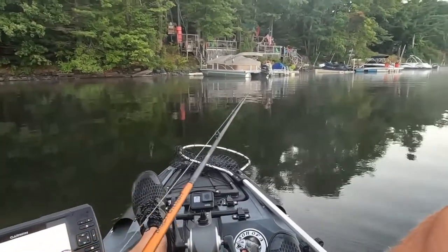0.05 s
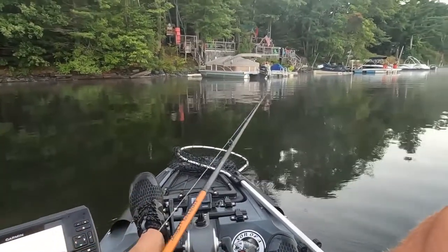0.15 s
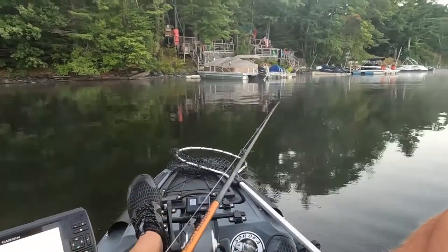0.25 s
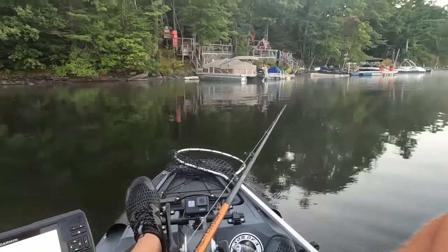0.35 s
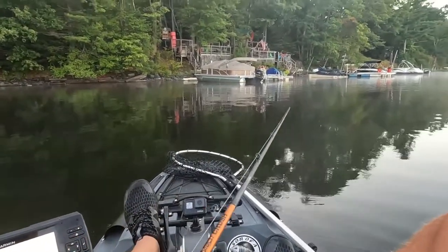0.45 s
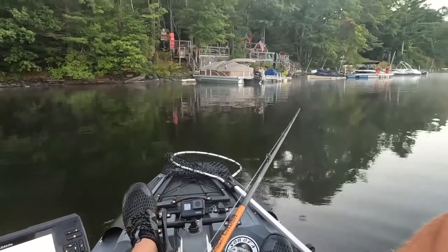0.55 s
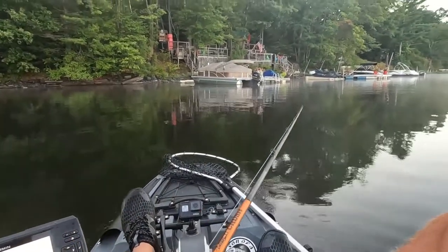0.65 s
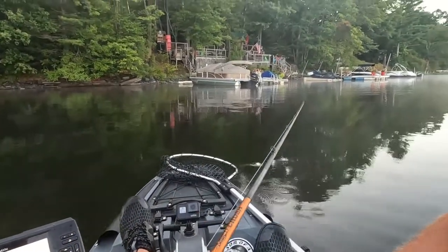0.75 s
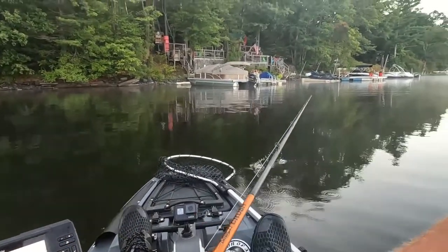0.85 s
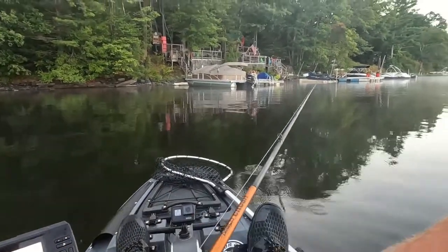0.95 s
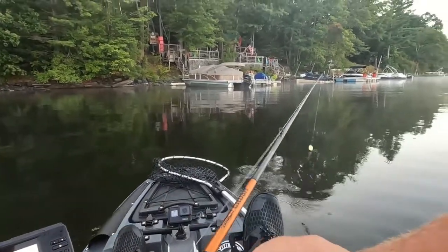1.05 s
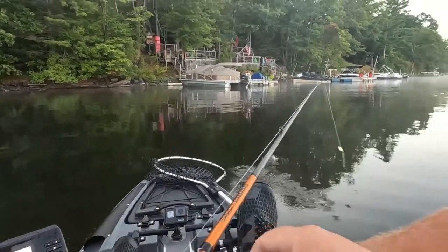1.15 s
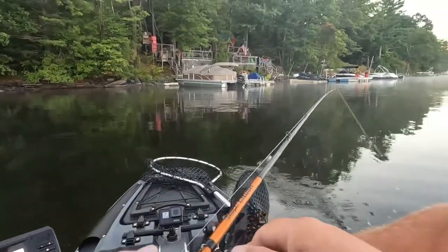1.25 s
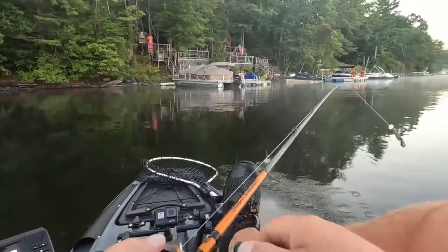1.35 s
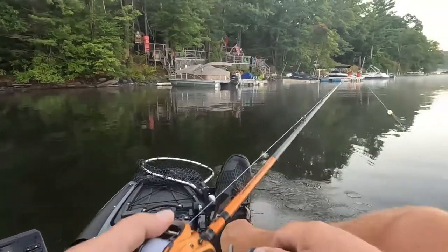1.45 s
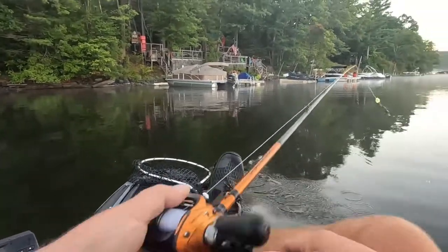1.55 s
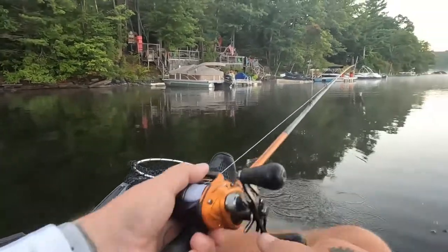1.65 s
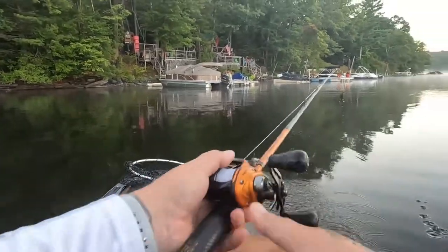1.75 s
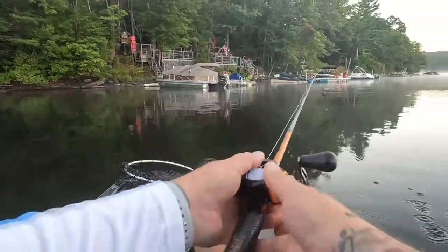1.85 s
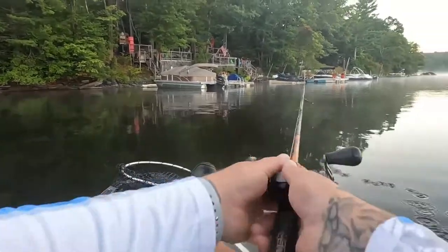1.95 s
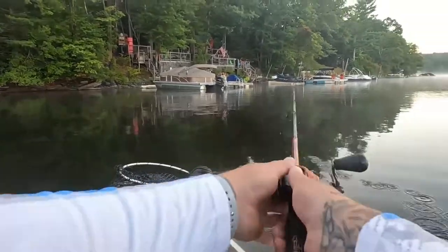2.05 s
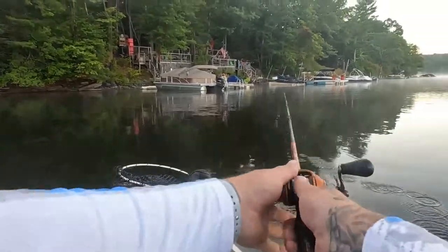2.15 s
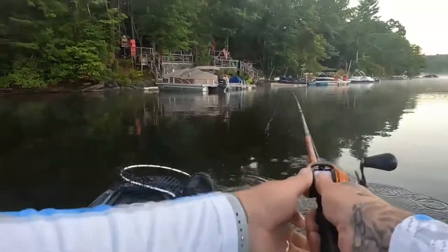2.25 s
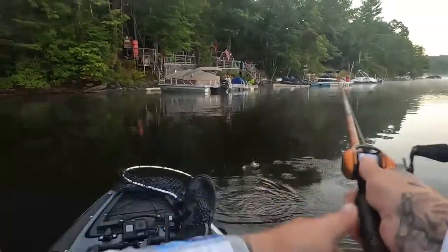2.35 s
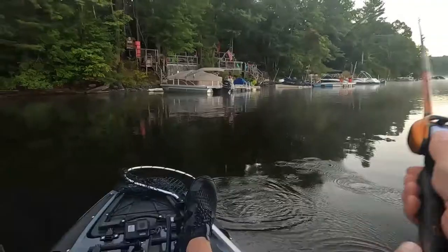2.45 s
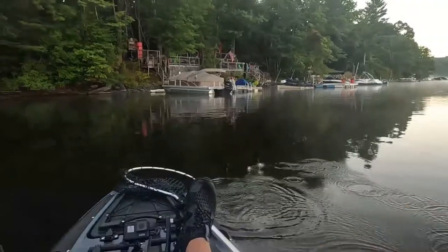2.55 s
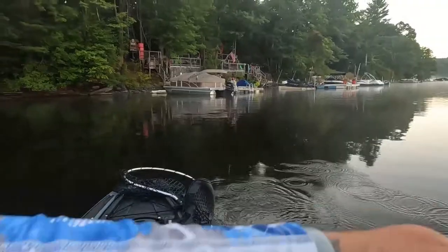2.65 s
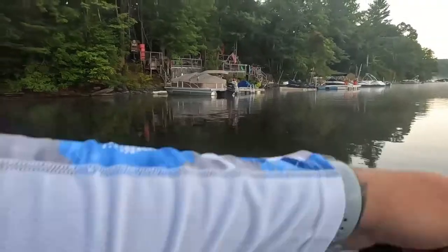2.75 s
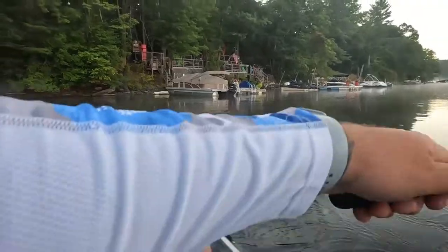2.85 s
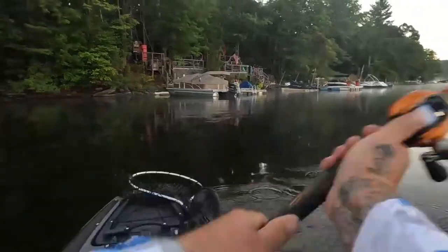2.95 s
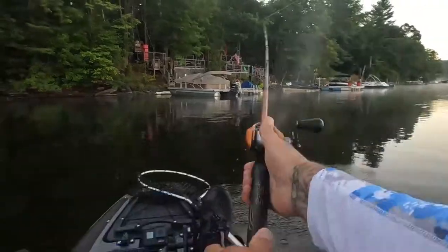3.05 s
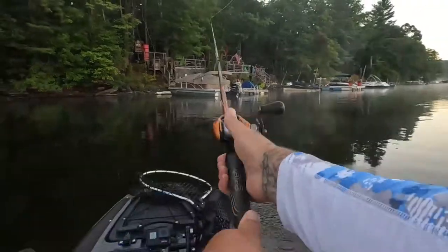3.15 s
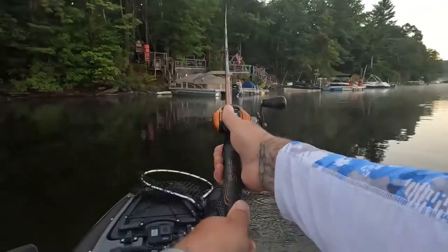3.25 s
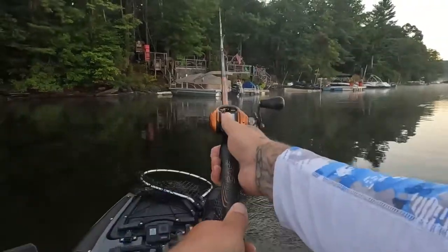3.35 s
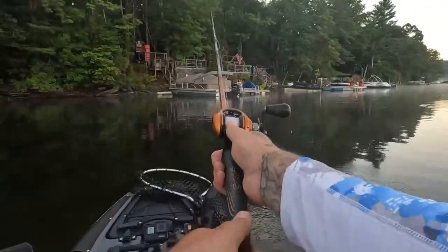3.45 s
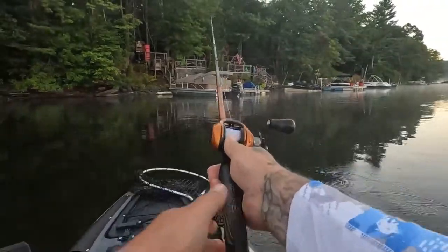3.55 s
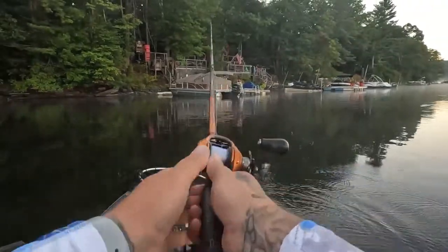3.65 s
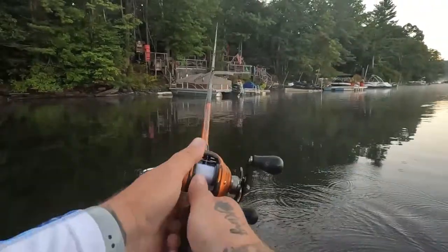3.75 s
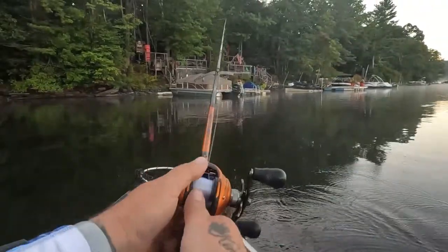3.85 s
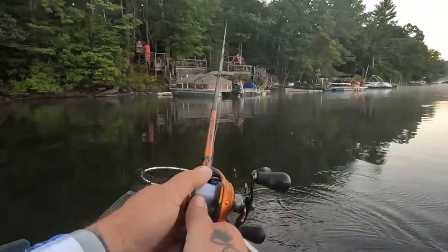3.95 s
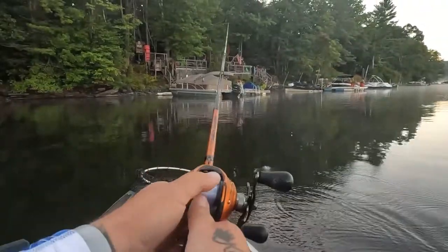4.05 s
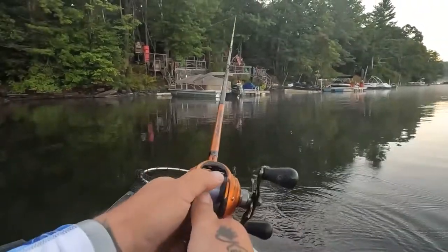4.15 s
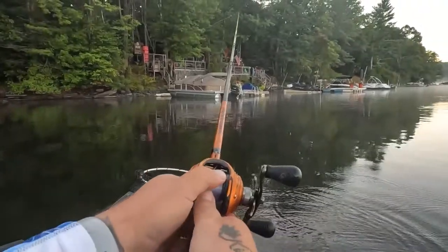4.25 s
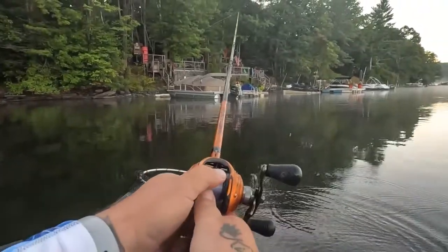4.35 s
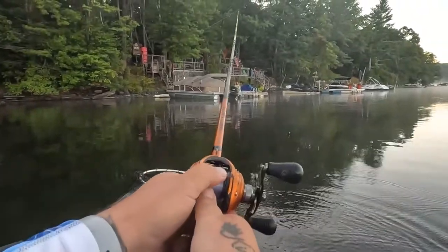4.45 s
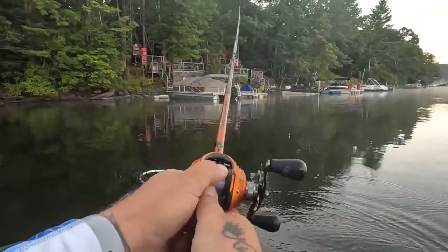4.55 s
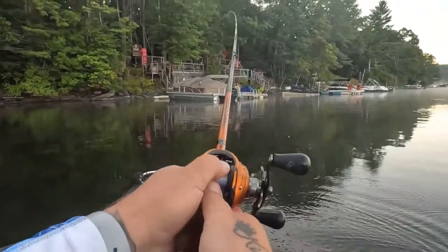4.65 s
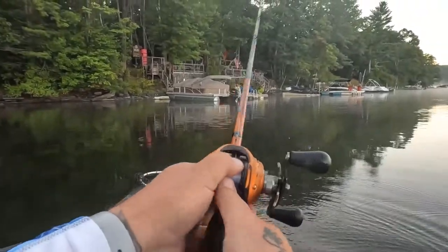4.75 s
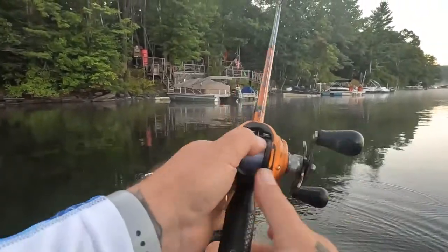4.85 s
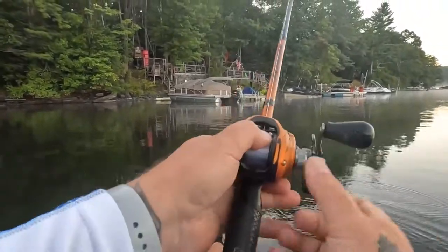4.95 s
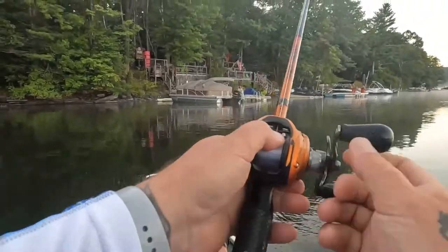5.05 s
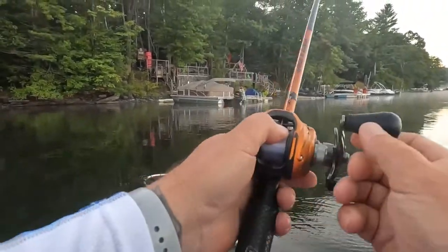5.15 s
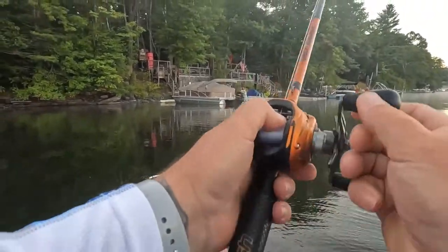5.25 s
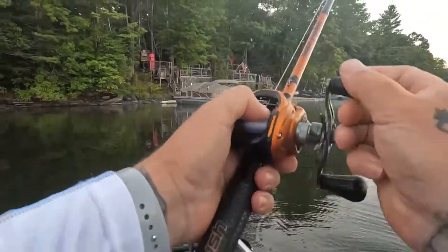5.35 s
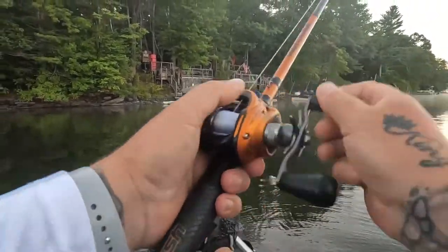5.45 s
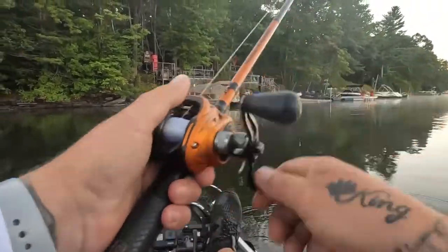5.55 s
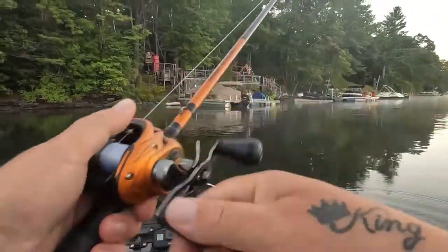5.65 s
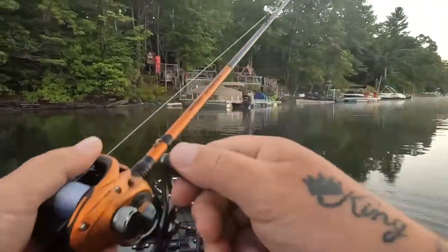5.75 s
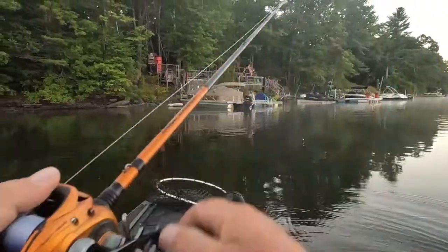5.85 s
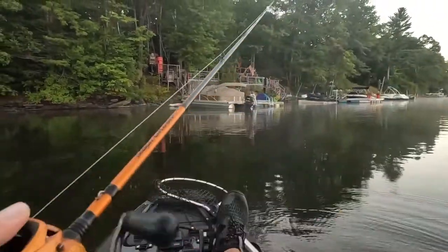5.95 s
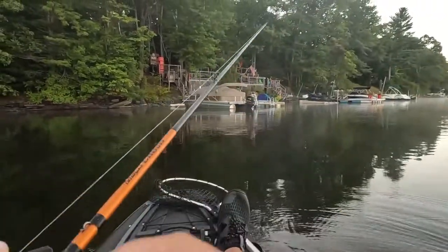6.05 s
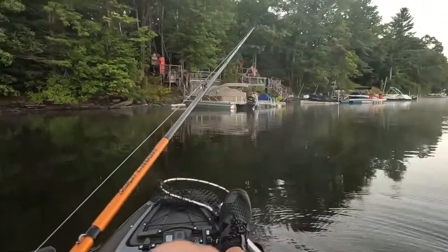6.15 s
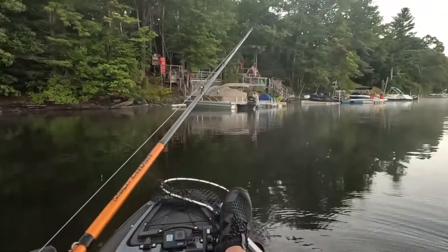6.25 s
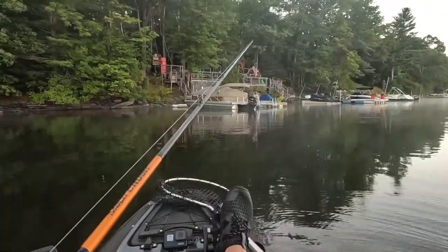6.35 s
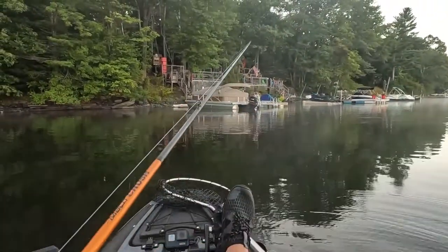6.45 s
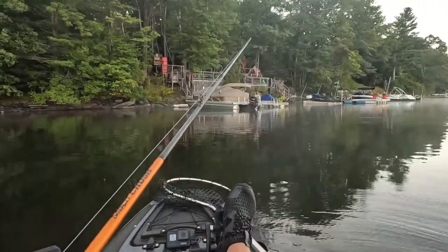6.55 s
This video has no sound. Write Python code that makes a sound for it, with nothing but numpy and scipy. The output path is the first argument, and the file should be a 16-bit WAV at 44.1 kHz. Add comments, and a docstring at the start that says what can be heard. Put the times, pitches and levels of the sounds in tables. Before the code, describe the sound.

Outdoors on a calm lake, a steady low air rumble and a faint wavering insect chorus lie beneath close handling sounds. From 0 to 1.2 s a reel winds with a soft, grainy gear whir, pulsing with each turn, with bright wet-line ticks, tiny rising drips and, near 0.9 s, dull hollow bumps and a little slosh. A short winding follows at 1.5-1.8 s, then rustling. At 2.33 s the clutch clicks free, crisp and doubled. More rustle at 2.8 s; at 3.03 s a sharp tick, bump and squeak, then a short cast whoosh to 3.2 s with a low gust. Line whirs off, hum and brightness falling, with prickly slaps, faint whistles and a thin descending whine, until 4.73 s. Light rustles and ticks follow. At 5.39 s a very loud metallic snap engages the reel; winding, rustle and small water laps resume from 5.56 s to the end.

```python
"""A calm lake: from a kayak an angler winds in a lure, frees the spool, casts and engages the reel again.
Gear teeth ring the housing, wet line ticks through the guides, clumped grains rustle, the clutch snaps in bursts.
Drops chirp, bumps ring dully and bubbles slosh; the cast is a noise whoosh and a gust at the microphone.
The spool hums and whines as it slows, and running line whirs, slaps and whistles.
Filtered noise makes the insects on the wooded shore and the low rumble of air at the microphone."""
import sys
import numpy as np
from scipy import signal
from scipy.fft import rfft, irfft, next_fast_len
from scipy.io import wavfile
from scipy.ndimage import uniform_filter1d

SR = 44100
rng = np.random.default_rng(int(sys.argv[2]) if len(sys.argv) > 2 else 0)


def unload_audio(sound):
    """Save the sound as a 16-bit wav file, at the path given as the first command line argument."""
    columns = np.transpose(np.atleast_2d(sound))
    # keep every value between -1 and 1, then stretch to whole-number steps
    steps = np.round(np.clip(columns, -1, 1) * 32767)
    wavfile.write(sys.argv[1], SR, steps.astype(np.int16))


N = 290608

# bouts of turning the handle: (start [s], end [s], mean whir level [dB],
# lift of the lowest ring against the others [dB], moment of a push [s])
WINDING = [(0, 1.174, -58.5, -5, .23), (1.455, 1.762, -58.5, 5, 1.6), (5.564, 6.18, -56, 9, 5.685),
           (6.213, 6.591, -56.5, -1, 6.24)]
# rings of the gear housing: (frequency [Hz], width [Hz], relative level [dB])
GEARS = [(1040, 79, 0), (2060, 720, 11.5), (3500, 1360, 5.5), (5500, 640, -2), (7500, 260, -2.5),
         (11800, 2100, -8)]
# rustling noise swells; the one at 5.38 s is a brief hiss just before the snap:
# (start [s], end [s], level [dB])
RUSTLE = [(0, 0.318, -63.5), (0.859, 1.188, -70), (1.298, 1.623, -77), (1.67, 1.843, -63),
          (1.916, 2.118, -57), (2.241, 2.494, -71), (2.792, 3.024, -60), (4.816, 4.875, -61),
          (4.942, 5.1, -64), (5.384, 5.38, -54.5), (5.598, 6.242, -61), (6.356, 6.59, -63.5)]
# free spool slowing down: (time [s], speed [turns/s])
SPOOL = [(3.2, 291), (3.49, 256), (3.6, 232), (3.82, 191), (4.09, 127), (4.15, 119), (4.35, 96),
         (4.729, 72)]
# treble of the line whir: (time [s], relative level [dB])
TREBLE = [(3.2, 2.5), (3.68, 0.5), (3.71, -6), (3.8, -3), (3.85, 4), (3.97, 1), (4.07, -0.5), (4.11, 2),
          (4.17, -1.5), (4.48, 5.5), (4.55, -4), (4.7, 2), (4.715, -12)]


def amp(db):
    """Decibels to gain."""
    return 10 ** (np.asarray(db, float) / 20)


def rms_one(x):
    """Scale to unit rms."""
    return x / np.sqrt(np.mean(x ** 2) + 1e-20)


def in_time(rows):
    """Columns of a curve table, one value a sample."""
    s, *columns = np.transpose(rows)
    return [np.interp(np.arange(N) / SR, s, c) for c in columns]


def envelope(table):
    """Gain from a (time [s], level [dB]) curve."""
    return amp(in_time(table)[0])


def swells(rows, rise_db_per_s, fall_db_per_s):
    """Summed gain of (start [s], end [s], level [dB]) rows: rise up to the start, hold, fall from the end."""
    t = np.arange(0, N + 16, 16) / SR
    gain = 0
    for start, end, db in rows:
        rise = rise_db_per_s * np.maximum(start - t, 0)
        fall = fall_db_per_s * np.maximum(t - end, 0)
        gain = gain + amp(db - rise - fall)
    return np.interp(np.arange(N) / SR, t, gain)


def at_hz(points, hz):
    """Spectrum table read on a log-frequency axis."""
    point_hz, value = np.array(points).T[:2]
    return np.interp(np.log(hz + 1e-9), np.log(point_hz), value)


def drift(rate_hz):
    """Slow random wander of unit rms: twice-smoothed noise, drawn every 40 samples."""
    r = np.exp(-80 * np.pi * rate_hz / SR)
    noise = rng.standard_normal(N // 40 + 2002)
    slow = signal.lfilter([1], [1, -2 * r, r * r], noise)[2000:]
    return np.interp(np.arange(N) / 40, np.arange(len(slow)), rms_one(slow))


def grains(per_s, spread_db):
    """Two trains of random contacts of uneven size and random sign."""
    sizes = amp(spread_db * np.minimum(rng.exponential(1, (2, N)), 5))
    signs = rng.choice([-1, 1], (2, N))
    return sizes * signs * (rng.random((2, N)) < per_s / SR)


def mix_sides(mid, side, alike):
    """Mid and side sources to left and right with a given likeness between the channels."""
    alike = np.clip(alike, -1, 1)
    return np.sqrt(1 + alike) * mid + np.sqrt(1 - alike) * side * np.array([[1], [-1]])


def coloured(pair, spectrum):
    """A mid and a side source shaped by a spectrum and mixed to left and right; rms 1."""
    # how alike left and right are: (frequency [Hz], likeness [-1 to 1])
    likeness = [(30, 0.92), (60, 1), (150, 0.96), (400, 0.62), (1400, 0.41), (5000, 0.67), (15000, 0.054)]
    size = next_fast_len(N)
    hz = np.arange(size // 2 + 1) * SR / size
    mid, side = rfft(pair, size)
    both = mix_sides(mid, side, at_hz(likeness, hz))
    return rms_one(irfft(both * amp(at_hz(spectrum, hz)), size)[:, :N])


def spread(pair, alike, pan_db):
    """Mid and side to left and right at unit rms, then panned; positive leans left."""
    return rms_one(mix_sides(*pair, alike)) * amp([[pan_db / 2], [-pan_db / 2]])


def resonance(x, hz, width_hz):
    """Two-pole peak of gain 1."""
    r = np.exp(-np.pi * width_hz / SR)
    feedback = [1, -2 * r * np.cos(2 * np.pi * hz / SR), r * r]
    return signal.lfilter(np.array([1, 0, -1]) * (1 - r * r) / 2, feedback, x)


def add(out, s, sound, peak_db, pan_db):
    """Place a short sound at its moment with a peak level before panning; it reaches the left port late."""
    lag_samples = .5
    i = round(s * SR)
    sound = sound[:N - i] / np.abs(sound).max() * amp(peak_db)
    steps = np.arange(len(sound))
    late = np.interp(steps - lag_samples, steps, sound, left=0)
    out[0, i:i + len(sound)] += late * amp(pan_db / 2)
    out[1, i:i + len(sound)] += sound * amp(-pan_db / 2)


def rumble():
    """Low noise of moving air at the microphone, a little stronger on the left."""
    # (time [s], level before panning [dB])
    air_level = [(0.0, -42), (1.8, -40.5), (6.59, -42.5)]
    # (frequency [Hz], relative level per Hz [dB])
    air_colour = [(15, -9), (28, -8), (66, -0.5), (120, -6), (206, -17), (300, -23), (500, -33), (800, -34),
                  (1500, -58)]
    noise = coloured(rng.standard_normal((2, N)), air_colour)
    return noise * envelope(air_level) * amp([[.8], [-.8]])


def shore():
    """Noise shaped to a dull far hum and an insect chorus, wavering in level."""
    # (frequency [Hz], relative level per Hz [dB])
    chorus_colour = [(600, -69), (900, -16.5), (1100, -4), (1400, -8.5), (1800, -21.5), (3300, -27),
                     (4150, -11.5), (4400, -3.5), (4900, -3.5), (5300, -10), (5700, -26.5), (9000, -40.5),
                     (16000, -66)]
    # level about which the chorus wavers: (time [s], level [dB])
    chorus_level = [(0, -55), (3, -58.5), (6.59, -56)]
    noise = coloured(rng.standard_normal((2, N)), chorus_colour)
    return noise * envelope(chorus_level) * amp(1.3 * drift(27.4))


def winding():
    """Dense tooth contacts ring the gear housing, left of the microphone."""
    handle_turn_s, push_db = .34, 3.2
    teeth = grains(2000, spread_db=3.2) * amp(3 * drift(12))
    rings = []
    for hz, width_hz, db in GEARS:
        ring = resonance(resonance(teeth, hz, 2 * width_hz), hz, width_hz)
        rings.append(amp(db) * ring / np.sqrt(width_hz))
    lowest, others = rings[0], sum(rings[1:])
    out = 0
    for start, end, db, low_db, push in WINDING:
        # the whir jumps at each push, then sags
        since_push = (np.arange(N) / SR - push) / handle_turn_s % 1
        bout = swells([(start, end, db)], rise_db_per_s=250, fall_db_per_s=175)
        effort = bout * amp(push_db * (1 - 2 * since_push))
        out = out + spread(lowest * amp(low_db) + others, alike=0.59, pan_db=3.5) * effort
    return out


def rustle():
    """Rustling noise: dense small grains, clumped by a wandering level and shaped by a spectrum."""
    # (frequency [Hz], relative level per Hz [dB])
    rustle_colour = [(300, -29), (1300, -2.5), (2500, -4), (6000, -7.5), (10500, -13.5), (11800, -8),
                     (14400, -20), (16000, -23)]
    clumps = grains(7000, spread_db=0.5) * amp(1.22 * drift(44))
    return coloured(clumps, rustle_colour) * swells(RUSTLE, rise_db_per_s=229, fall_db_per_s=175)


def ticks():
    """Wet line and fingers tick: tiny bursts in a wide resonance that also tap the gear housing."""
    # ticks on guides and reel: (time [s], peak level before panning [dB], pitch [Hz])
    clear_ticks = [(0.025, -33.5, 7950), (0.0598, -36.5, 7400), (0.0967, -36, 7560), (0.1454, -32, 6800),
                   (0.212, -28.5, 7250), (0.2386, -23, 7260), (0.2871, -29, 6800), (0.365, -30.5, 6500),
                   (0.4313, -27, 7500), (0.4625, -35.5, 7850), (0.514, -30.5, 7360), (0.528, -37, 7700),
                   (0.887, -25.5, 6100), (1.036, -32, 10400), (1.2154, -34.5, 7140), (1.561, -36.5, 5600),
                   (1.706, -34, 5450), (1.8801, -23.5, 5630), (2.3123, -36, 4960), (3.0447, -18, 5700),
                   (4.8508, -36, 6700), (4.861, -33.5, 6530), (5.288, -47, 5500), (5.961, -39, 6990),
                   (6.347, -37, 7050), (6.3876, -36, 7300), (6.4358, -37, 7200), (6.4717, -40, 7700),
                   (6.538, -37, 7500)]
    faint_per_s, loudest_faint_db = 5.6, -42.5
    out, t = np.zeros((2, N)), np.arange(1500) / SR
    # faint ticks fall at random during the winding and the rustling
    faint = []
    for start, end, *_ in WINDING + RUSTLE:
        for at, weak, high, odds in rng.random((20, 4)):
            if odds < faint_per_s * (end - start) / 20:
                s = start + at * (end - start - .01)
                faint.append((s, loudest_faint_db - 8 * weak, 5500 + 3000 * high))
    for s, db, hz in clear_ticks + faint:
        burst = rng.standard_normal(len(t)) * t * np.exp(-t / 0.00043)
        burst = signal.lfilter([1, -.7], [1], burst)
        housing = resonance(burst, *GEARS[1][:2])
        add(out, s, resonance(burst, hz, 940) + 0.26 * burst + 0.42 * housing, db, pan_db=11.0)
    return out


def drips():
    """Drops off the lure and a squeak at the release: short blips that rise in pitch and flutter."""
    # (time [s], peak level [dB], starting pitch [Hz])
    blips = [(0.3823, -44, 1280), (0.406, -48, 2140), (0.638, -50, 1270), (0.786, -41.5, 1090),
             (0.955, -39.5, 1200), (0.966, -43, 1045), (1.009, -45, 1320), (1.1414, -47, 2390),
             (1.196, -46, 2260), (3.034, -38, 2450), (3.044, -33, 2380), (3.057, -32, 2430)]
    out, t = np.zeros((2, N)), np.arange(1500) / SR
    for s, db, hz in blips:
        flutter = 1 + 2.7 * uniform_filter1d(rng.standard_normal(len(t)), size=40)
        tone = np.sin(2 * np.pi * hz * t * (1 + 1.7 * t))
        add(out, s, flutter * tone * t * np.exp(-t / 0.0025), db, 0)
    return out


def clutch():
    """Each knock or snap is a short rattle into the reel's modes, strongest near its own region."""
    # parts of the reel knocking: (time [s], peak level before panning [dB], strongest region [Hz])
    knocks = [(0.43, -35.5, 1380), (0.904, -38.5, 2510), (0.938, -39.5, 2230), (1.036, -41, 1800),
              (1.88, -43, 2000), (2.491, -47.5, 3480), (3.134, -22.5, 4000), (5.409, -39, 2800),
              (5.4126, -37, 2820), (5.418, -42, 2200), (5.844, -44, 1300), (6.029, -45, 1800),
              (6.357, -48, 2250)]
    # clutch out, then in, each a catch, blow and settling:
    # (time [s], peak level before panning [dB], rattle decay [ms], strongest region [Hz])
    snaps = [(2.3326, -15.5, 0.36, 4550), (2.3339, -13.5, 0.98, 4220), (2.338, -34, 2.5, 5000),
             (5.3903, -13, 0.45, 2380), (5.3921, -3, 0.78, 5740), (5.394, -27, 2.8, 2360)]
    # modes of the reel: (frequency [Hz], relative level [dB])
    modes = [(1250, 21.5), (1700, 11), (2200, 14.5), (2800, 0), (3500, 12.5), (3950, -0.5), (4580, 9),
             (5550, -3), (6650, 4), (7900, 6.5), (8900, -18), (10400, -15), (11800, -10), (14000, -8)]
    # shove as the clutch snaps in: (time [s], peak level [dB], decay [ms])
    jolt = (5.394, -17, 1.8)
    knock_ms = 3.15
    out, t = np.zeros((2, N)), np.arange(1500) / SR
    rattles = [(s, db, knock_ms, hz) for s, db, hz in knocks] + snaps
    for s, db, rattle_ms, centre_hz in rattles:
        burst = rng.standard_normal(len(t)) * t * np.exp(-t * 1000 / rattle_ms)
        rings = 0
        for hz, mode_db in modes:
            weight = amp(mode_db - 10.4 * np.log2(hz / centre_hz) ** 2)
            rings = rings + weight * resonance(burst, hz, 250 + 0.075 * hz)
        add(out, s, rings, db, .3)
    s, db, decay_ms = jolt
    add(out, s, -t * np.exp(-t * 1000 / decay_ms), db, 0)  # a one-sided pulse
    return out


def slosh():
    """Water stirred by lure and hull: small bubbles and laps ring a few cycles over three octaves."""
    # (start [s], end [s], level [dB])
    stirs = [(.89, 1.12, -55.5), (5.69, 5.74, -55.5), (6.03, 6.08, -54)]
    born, dealt = grains(1000, spread_db=0.5), rng.integers(0, 16, N)
    laps = 0
    for k, hz in enumerate(np.geomspace(300, 2500, 16)):
        bubbles = born * (dealt == k) + 1e-18
        laps = laps + resonance(bubbles, hz, hz / 4.4) * amp(-3.0 * np.log2(hz / 500))
    return spread(laps, alike=0.46, pan_db=0.0) * swells(stirs, rise_db_per_s=145.0, fall_db_per_s=161)


def bumps():
    """Lure, rod butt and hull bump: a ragged scuff rings a dull hollow."""
    # (time [s], peak level [dB], pitch [Hz], scuff decay [ms])
    thuds = [(.894, -31, 284, 3.5), (.904, -33.5, 257, 3.4), (.916, -38.5, 239, 6.3), (2.823, -39, 520, 2),
             (3.0285, -25.5, 545, 2.8), (3.037, -26, 382, 2.6), (6.055, -44, 507, 4.0)]
    out, t = np.zeros((2, N)), np.arange(1500) / SR
    for s, db, hz, scuff_ms in thuds:
        noise = rng.standard_normal(len(t)) * t * np.exp(-t * 1000 / scuff_ms)
        scuff = resonance(noise, hz, 1.4 * hz)
        add(out, s, resonance(scuff, hz, 0.63 * hz) + 0.21 * scuff, db, 0)
    return out


def line_rub():
    """Wet line squeezes through the tip guide: dense contacts hiss through two resonances in turn."""
    # (start [s], end [s], level before panning [dB])
    rubs = [(1.77, 1.8, -59)]
    hiss = resonance(resonance(grains(4600, spread_db=-13.5), 4500, 900), 6000, 900)
    return spread(hiss, alike=0.75, pan_db=6.0) * swells(rubs, rise_db_per_s=42, fall_db_per_s=700)


def whoosh():
    """Rod, then line, cut the air: turbulence as dense uneven grains of noise."""
    # (start [s], end [s], level [dB])
    cuts = [(3.03, 3.05, -41.5), (3.135, 3.16, -31.5)]
    # (frequency [Hz], relative level per Hz [dB])
    swish_colour = [(150, 5), (250, 2.5), (748, -1), (1220, 0), (1640, -0.5), (3520, -2), (7980, -13),
                    (10500, -10), (14700, -16), (16000, -44)]
    air = coloured(grains(6000, spread_db=3.5), swish_colour)
    return air * swells(cuts, rise_db_per_s=507, fall_db_per_s=246)


def gust():
    """The swing pushes air over the microphone ports: slow lumpy noise, stronger in the right port."""
    # (start [s], end [s], level before panning [dB])
    pushes = [(3.055, 3.12, -32.5)]
    band = signal.butter(2, [16, 52], "band", fs=SR, output="sos")
    low = signal.sosfilt(band, rng.standard_normal((2, N)))
    return spread(low, alike=0.9, pan_db=-11.0) * swells(pushes, rise_db_per_s=220, fall_db_per_s=95)


def spool():
    """The slowing spool drives an unbalance hum, the whir of the line and a whine against the thumb."""
    turns, = in_time(SPOOL)
    octaves = np.log2(turns / 280)  # hum and whir levels refer to 280 turns/s
    angle = 2 * np.pi * np.cumsum(turns * (1 + 0.00261 * drift(20.1))) / SR
    running = swells([(SPOOL[0][0], SPOOL[-1][0], 0)], rise_db_per_s=500, fall_db_per_s=2000)
    return running * (spool_hum(octaves, angle) + line_whir(octaves, angle) + thumb_whine(turns, angle))


def spool_hum(octaves, angle):
    """Unbalance shakes the reel at multiples of the turning rate, weakening as the spool slows."""
    # (multiple of the turning rate, relative level [dB], dies away from [s])
    orders = [(1, 5, 3.7), (2, -3, 3.49), (4, -2, 3.54)]
    db_at_reference, db_per_octave = -55, 16
    hum = 0
    for k, db, end in orders:
        fade = swells([(0, end, db)], rise_db_per_s=1, fall_db_per_s=300)
        hum = hum + amp(3.5 * drift(30)) * fade * np.sin(k * angle)
    return amp(db_at_reference + db_per_octave * octaves) * hum


def line_whir(octaves, angle):
    """Running line flaps in the guides, a little unevenly each turn, and rings guides and reel frame."""
    # (frequency [Hz], width [Hz], relative level free [dB], relative level under the thumb [dB])
    frame_modes = [(1010, 640, -5.5, -6), (1467, 230, -10.5, 2), (2000, 416, -4.5, 3), (2450, 520, -5, -7),
                   (3250, 600, -1, 0), (5200, 1600, -10.5, -5.5), (7700, 610, -14.5, -16),
                   (9700, 1500, -14.5, -17), (11100, 2100, -16, -8.5), (13700, 2100, -18, -30)]
    # the whir surges briefly: (start [s], end [s], added level before panning [dB])
    surges = [(4.1, 4.13, -52)]
    db_at_reference, db_per_octave = -41.5, 6
    treble_hz = 6000
    thumb_from_s, thumb_down_s = 3.56, 4.4
    # the thumb settles on the spool: share of its colour, never under a tenth
    thumb = np.clip((np.arange(N) / SR - thumb_from_s) / (thumb_down_s - thumb_from_s), .1, 1)
    flaps = grains(6000, spread_db=1.5) * (1 + 0.085 * np.cos(angle)) * amp(1.0 * drift(45))
    treble_db, = in_time(TREBLE)
    whir = 0
    for k, (hz, width_hz, free_db, held_db) in enumerate(frame_modes):
        mode_db = free_db + (held_db - free_db) * thumb + 2.0 * drift(4.5)
        if hz > treble_hz:
            mode_db = mode_db + treble_db + 2.0 * drift(30)
        ring = resonance(resonance(flaps, hz, 3 * width_hz), hz, width_hz) / np.sqrt(width_hz)
        whir = whir + (-1) ** k * amp(mode_db) * ring
    surge = swells(surges, rise_db_per_s=304, fall_db_per_s=296)
    level = amp(db_at_reference + db_per_octave * octaves) + surge
    return spread(whir, alike=0.59, pan_db=0.9) * level


def thumb_whine(turns, angle):
    """A high spot of the coil brushes the thumb once a turn; its partials flicker as they sweep by 1720 Hz."""
    # (start [s], end [s], rms level of a partial before weighting and flicker [dB])
    brushes = [(3.83, 4.1, -56.5)]
    whine = 0
    for k in range(8, 15):
        # partials show only near the frame's lower resonances; the 11th stands out
        weight_db = -40 * np.log2(k * turns / 1720) ** 2 - 3 * (k != 11)
        whine = whine + amp(weight_db + 4.5 * drift(18)) * np.sin(k * angle)
    return np.sqrt(2) * whine * swells(brushes, rise_db_per_s=70, fall_db_per_s=35)


def slaps():
    """Loose loops of line slap a guide, each a brief prickle near its pitch."""
    # (time [s], peak level before panning [dB], pitch [Hz])
    clear_slaps = [(3.331, -52, 9590), (3.3667, -39.5, 9840), (3.4262, -44, 7600), (3.4473, -40, 7800),
                   (3.4691, -37, 10100), (3.5833, -38, 7610), (3.601, -37, 8100), (3.7995, -38, 7760),
                   (3.8537, -36, 7050), (4.0922, -42, 10700), (4.6867, -43, 10600)]
    faint_per_s, faint_db = 60, -43
    out, t = np.zeros((2, N)), np.arange(400) / SR
    start, end = SPOOL[0][0], SPOOL[-1][0]
    # fainter slaps fall at random, sinking along the run and swelling with the whir's treble
    faint = []
    for at, weak, high in rng.random((round(faint_per_s * (end - start)), 3)):
        s = start + at * (end - start)
        swell_db = np.interp(s, *np.transpose(TREBLE)) / 2
        faint.append((s, faint_db - 8 * (weak + at) + swell_db, 6800 + 4500 * high))
    for s, db, hz in list(clear_slaps) + faint:
        burst = rng.standard_normal(len(t)) * t * np.exp(-t / 0.00029)
        prickle = resonance(resonance(burst, hz, 2500), hz, 2500)
        add(out, s, prickle, db, rng.uniform(-1.4, 3.2))
    return out


def strands():
    """Thin whistles while line runs off: each tone glides, wanders in pitch and flickers in level."""
    # (start [s], end [s], first pitch [Hz], last pitch [Hz], peak level before flicker [dB])
    whistles = [(3.23, 3.34, 3400, 3300, -60), (3.5, 3.69, 3230, 3400, -58), (3.53, 3.66, 2900, 2950, -60),
                (3.55, 3.76, 2680, 2820, -62), (3.88, 4.03, 1430, 1450, -57), (4.08, 4.28, 1460, 1400, -57),
                (4.3, 4.45, 1480, 1720, -60)]
    t = np.arange(N) / SR
    out = 0
    for start, end, from_hz, to_hz, db in whistles:
        glide = np.interp(t, [start, end], [from_hz, to_hz])
        pitch = glide * (1 + .006 * drift(8) + .008 * drift(40))
        tone = np.sin(2 * np.pi * np.cumsum(pitch) / SR)
        swell = swells([(start, end, db)], rise_db_per_s=250, fall_db_per_s=200)
        out = out + tone * amp(3 * drift(12)) * swell
    return out


def scene():
    """All sources at the microphone."""
    surroundings = rumble() + shore()
    handling = winding() + rustle() + ticks() + clutch() + bumps()
    water = drips() + slosh()
    line_and_cast = line_rub() + whoosh() + gust() + spool() + slaps() + strands()
    return surroundings + handling + water + line_and_cast


def record(dry):
    """The microphone housing dips the low middle and rolls off the last octave, then the top is cut steeply."""
    dipped = dry - .5 * resonance(dry, 762, 241.0)
    soft = signal.sosfilt(signal.butter(4, 13700, fs=SR, output="sos"), dipped)
    steep = signal.cheby2(14, 50, 16400, fs=SR, output="sos")  # 50 dB down from 16400 Hz
    return signal.sosfilt(steep, soft)


dry = scene()
out = record(dry)
unload_audio(out)
```